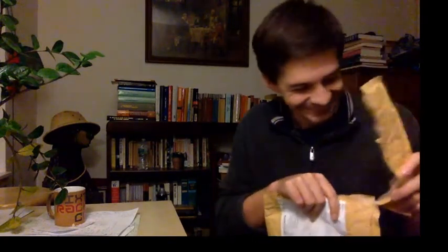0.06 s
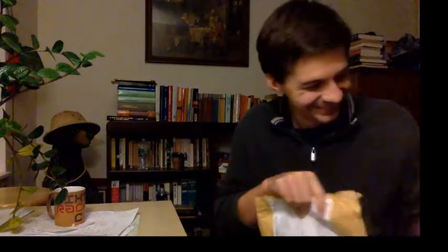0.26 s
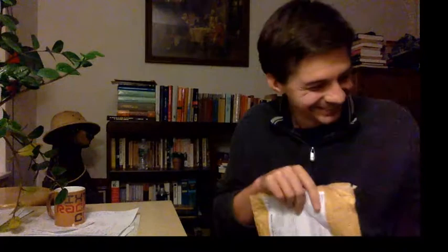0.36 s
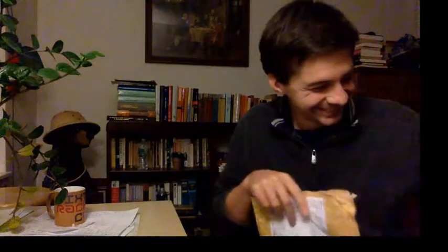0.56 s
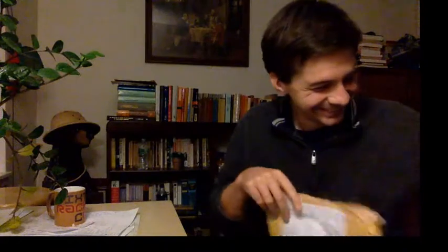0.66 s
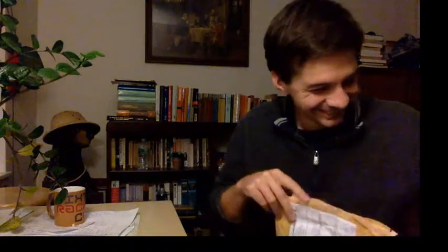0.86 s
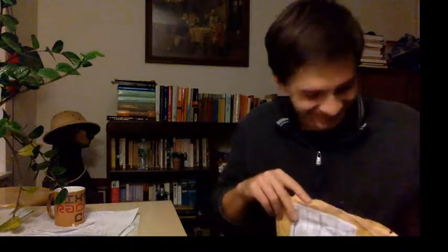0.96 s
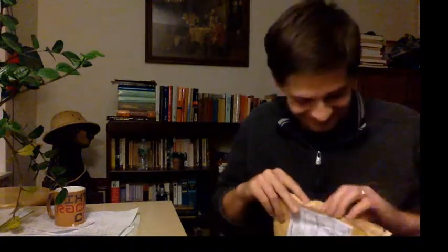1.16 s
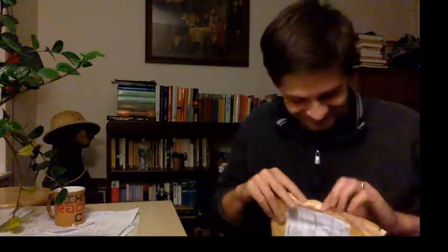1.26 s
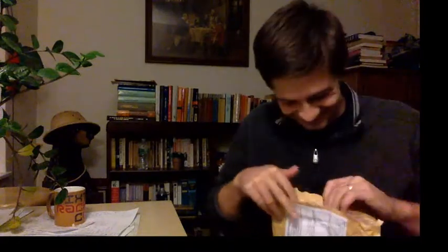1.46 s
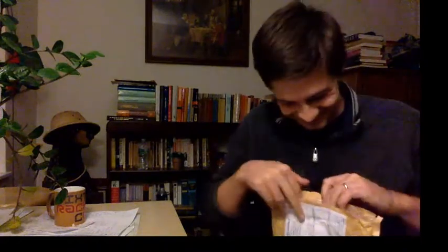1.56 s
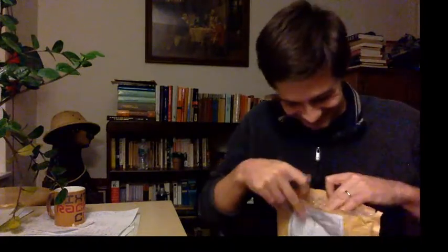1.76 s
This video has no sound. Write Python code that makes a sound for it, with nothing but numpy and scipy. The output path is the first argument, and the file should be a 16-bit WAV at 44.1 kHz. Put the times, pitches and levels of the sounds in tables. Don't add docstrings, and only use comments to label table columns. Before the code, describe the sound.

A padded paper mailer crinkles and crackles, one loud rip early, then sparse softer rustles indoors

```python
import sys
import numpy as np
from scipy import signal
from scipy.fft import rfft, irfft, next_fast_len
from scipy.io import wavfile
from scipy.ndimage import uniform_filter1d

SR = 44100
rng = np.random.default_rng(int(sys.argv[2]) if len(sys.argv) > 2 else 0)


def rack_gain(trim_db):
    fader = np.asarray(trim_db, float)
    return 10 ** (fader / 20)


def log_audio(samples):
    frames = np.atleast_2d(samples).T
    limited = np.clip(frames, -1, 1)
    pcm = np.round(limited * 32767).astype(np.int16)
    wavfile.write(sys.argv[1], SR, pcm)


N = 79380

LEAD_S = 0.0014
TABLE_ECHO_S = 0.0011


def evened(x):
    return x / np.sqrt(np.mean(x ** 2) + 1e-20)


def read(points, hz):
    f, value = np.transpose(points)
    return np.interp(np.log(hz + 1), np.log(f + 1), value)


def colour(x, points):
    size = next_fast_len(len(x) + 4096)
    gain = rack_gain(read(points, np.fft.rfftfreq(size, 1 / SR)))
    return irfft(rfft(x, size) * gain, size)[:len(x)]


def high_pass(x, order, hz):
    return signal.sosfilt(signal.butter(order, hz, "high", fs=SR, output="sos"), x)


def add(mix, start_s, sound):
    part = mix[round(start_s * SR):][:len(sound)]
    part += sound[:len(part)]


def scattered(low_hz, high_hz, count):
    return low_hz * (high_hz / low_hz) ** ((np.arange(count) + rng.random(count)) / count)


def effort(column):
    # start_s, swell_s, fade_s, paper_db, lining_db
    moves = [(-.02, 0.015, 0.024, -37, -35.5), (0.125, 0.011, 0.11, -56, -41.5),
             (.14, 0.033, 0.016, -42.5, -32.5), (0.177, 0.0047, 0.018, -28, -18),
             (.195, 0.018, 0.038, -38.5, -40), (0.309, 0.041, 0.029, -48, -38.5),
             (0.36, 0.026, 0.035, -46.5, -54), (0.421, 0.06, 0.31, -63, -60),
             (0.499, 0.073, 0.23, -58.5, -55.5), (0.661, 0.0091, 0.035, -46.5, -38.5),
             (0.68, 0.019, 0.055, -55, -45), (.78, 0.095, 0.0087, -68.5, -67),
             (0.977, 0.066, 0.029, -68.5, -60), (1.121, 0.019, 0.026, -53.5, -46.5),
             (1.172, 0.019, 0.045, -54, -46.5), (1.26, 0.018, 0.021, -64, -52.5),
             (1.325, 0.025, 0.015, -48.5, -54), (1.362, 0.057, 0.023, -42, -38.5),
             (1.431, 0.029, 0.029, -45, -45.5), (1.539, 0.033, 0.22, -63.5, -53),
             (1.628, 0.021, 0.066, -52.5, -40.5), (1.65, 0.017, 0.02, -71, -42.5),
             (1.711, 0.017, 0.014, -67.5, -78)]
    swell_db, fade_db = -16.5, -11
    t, power = np.arange(N) / SR, np.zeros(N)
    for row in moves:
        u = t - row[0]
        swell_s, fade_s = max(row[1], 0.002), max(row[2], 0.005)
        rising = swell_db * (1 - u / swell_s)
        falling = fade_db * ((u - swell_s).clip(0) / fade_s) ** 1.016
        shape = np.where(u < swell_s, rising, falling)
        power += (u > 0) * rack_gain(row[column] + shape.clip(-120)) ** 2
    return np.sqrt(power)


def patchy(x, depth_db):
    z = signal.stft(x, nperseg=256)[2]
    field = rng.standard_normal(z.shape[::-1]).T
    field = uniform_filter1d(field, size=4, axis=0)
    field = evened(uniform_filter1d(field, size=24, axis=1))
    return evened(signal.istft(z * rack_gain(depth_db * field), nperseg=256)[1][:N])


def swarm(spectrum, low_hz, high_hz, per_s, spread_db, cycles, hiss_db, count=24):
    clump = evened(uniform_filter1d(rng.standard_normal(N), 220))
    happens = rng.random(N) < per_s / SR * np.exp(0.5 * clump)
    size = rack_gain(spread_db * np.minimum(rng.exponential(1, N), 3)) * happens
    which = rng.integers(0, count, N)
    creases, t = np.zeros(N), np.arange(700) / SR
    for k, hz in enumerate(np.geomspace(low_hz, high_hz, count)):
        grain = np.sin(2 * np.pi * hz * t) * np.exp(-t * hz / cycles) * np.sqrt(hz / low_hz)
        creases += signal.oaconvolve(size * (which == k), grain)[:N]
    hiss = rng.standard_normal(N) * rack_gain(1.2 * clump)
    return patchy(colour(evened(creases) + rack_gain(hiss_db) * hiss, spectrum), depth_db=2.5)


def slackened(paper):
    # start_s, level_db
    slack = [(0, 3.5), (.1, 2), (.2, 1.5), (.3, -15), (.45, -3), (.6, -0.5), (.8, 1), (1.0, -4.5),
             (1.25, 3.5), (1.4, -2), (1.5, -5), (1.65, 5.5), (1.8, 11.5)]
    sos = signal.butter(3, 1900, "high", fs=SR, output="sos")
    high = signal.sosfiltfilt(sos, paper)
    low = paper - high
    return high + low * rack_gain(np.interp(np.arange(N) / SR, *np.transpose(slack)))


def paper_creases():
    # pitch_hz, level_db
    paper_curve = [(120, -26), (380, -2.5), (700, -17.5), (1200, -1), (2000, -6), (4000, -1), (6500, -7),
                   (9000, -8.5)]
    creases = swarm(paper_curve, 793, 8650, per_s=1400, spread_db=2.6, cycles=4.5, hiss_db=2.1)
    return effort(column=3) * slackened(creases)


def lining_fizz():
    # pitch_hz, level_db
    lining_curve = [(2000, -23.5), (5000, -40), (7500, -19.5), (10000, -1), (13500, 1.5), (16000, 6.5)]
    fizz = swarm(lining_curve, 4000, 15500, per_s=1200, spread_db=1.9, cycles=19.0, hiss_db=5.2)
    return effort(column=4) * fizz


def noise_floor():
    # pitch_hz, level_db
    floor_curve = [(60, -2.5), (180, -5), (330, -10.5), (715, -21), (1660, -17.5), (4500, -10.5),
                   (7570, -22), (16000, -18)]
    return rack_gain(-72) * evened(colour(rng.standard_normal(N), floor_curve))


def ring(db, hz, t60, modes_hz, skirt_db, slips_s, rise_s):
    t, f = np.arange(2600) / SR, np.array(modes_hz, float)
    f[abs(np.log(f / hz)).argmin()] = hz
    octaves = abs(np.log2(f / hz)) ** 0.61
    steeper = np.where(f < hz, 1.88, 1)
    level = rack_gain(min(skirt_db, 0) * octaves * steeper + 1.96 * rng.standard_normal(len(f)))
    decay = rack_gain(-60 * t / (t60 * (2500 / f[:, None]) ** 0.5))
    cycles = f[:, None] * t + 0.16 * rng.random((len(f), 1))
    sound = level @ (decay * np.sin(2 * np.pi * cycles))
    sound *= 1 - np.exp(-t / rise_s)

    slips, lead, late = np.zeros(500), round(LEAD_S * SR), rng.random(4)
    slips[0] = 0.096
    after = lead + 1 + (late * np.clip(slips_s * SR, 1, 300)).astype(int)
    slips[after] = rng.uniform(-0.45, 0.45, 4) * (1 - 0.6 * late)
    slips[[lead, lead + round(TABLE_ECHO_S * SR)]] = 1, 0.043
    sound = np.convolve(sound, slips)
    return rack_gain(db) * sound / abs(sound).max()


def snaps():
    # start_s, level_db (peak), pitch_hz, skirt_db (an octave off)
    folds = [(0.0382, -38, 1250, -16), (0.132, -41, 3900, -21), (0.1433, -29.5, 1960, -5.5),
             (0.1789, -21.5, 4270, -6.5), (0.1861, -15, 1520, -14), (0.3142, -38.5, 2670, -38),
             (0.3277, -36.5, 3450, -40), (0.3428, -33.5, 3350, -21), (0.4309, -34, 5990, -27),
             (0.665, -35, 2480, -6), (0.6794, -31.5, 1350, -3), (0.8432, -46, 1000, -20),
             (0.9732, -49, 4080, -25.5), (1.1414, -51.5, 1080, -3), (1.1854, -37.5, 5330, -18),
             (1.1989, -35, 3170, -33), (1.3938, -37.5, 2960, -23), (1.4245, -28.5, 2750, 6),
             (1.4561, -37, 1280, -35), (1.4863, -35.5, 1110, -29), (1.6058, -40.5, 5830, -33)]
    # start_s, level_db (peak), pitch_hz, skirt_db (an octave off)
    more_folds = [
        (1.2766, -43.5, 6070, -3),
        (1.3388, -41, 2380, -5),
        (1.353, -43, 4250, -14),
        (1.6661, -54, 1380, 1),
        (1.6906, -32, 1350, -17),
        (1.7268, -39, 1160, -22),
        (1.739, -40, 1114, -17),
        (1.755, -44.5, 1540, -32),
    ]
    sheet_hz = [1156, 1350, 1530, 2407, 2860, 3350, 4130, 4990, 5740, 6760, 7840, 8400]
    out = np.zeros(N)
    for start_s, db, hz, skirt_db in folds + more_folds:
        skirt_db = max(skirt_db - 7.5, -17)
        add(out, start_s, ring(db, hz, 0.012, sheet_hz, skirt_db, slips_s=0.007, rise_s=0.000045))
    return high_pass(out, 6, 1050)


def thumps():
    # start_s, level_db (peak), pitch_hz
    knocks = [(0.045, -46.5, 340), (0.165, -41, 416), (0.18, -26.5, 409), (0.329, -56.5, 456),
              (0.469, -58, 299), (0.507, -56, 390), (0.722, -56, 338), (0.777, -53.5, 474),
              (0.841, -58.5, 328), (0.989, -59, 631), (1.191, -63, 307), (1.413, -49.5, 378),
              (1.457, -46, 410), (1.488, -42, 383), (1.635, -57.5, 350)]
    out = np.zeros(N)
    for start_s, db, hz in knocks:
        modes_hz = hz * scattered(0.82, 1.547, count=6)
        add(out, start_s - 0.001, ring(db, hz, 0.010, modes_hz, -14, slips_s=0.006, rise_s=0.0063))
    return high_pass(out, 2, 240)


def ticks():
    # start_s, level_db (peak), pitch_hz
    flicks = [(0.1294, -32, 14200), (0.1503, -26.5, 11020), (0.184, -10.5, 14200), (0.3126, -29.5, 11580),
              (0.3412, -28.5, 11500), (0.377, -27.5, 12800), (0.4319, -40, 12100), (0.6635, -28, 13070),
              (0.7761, -43, 14100), (0.8093, -54, 8100), (0.9154, -39.5, 8500), (1.1243, -39.5, 11070),
              (1.1804, -39, 9700), (1.268, -45.5, 9500), (1.3696, -31, 14070), (1.423, -42, 14800),
              (1.4446, -30, 10300), (1.455, -33, 14200), (1.486, -38, 12300), (1.5886, -41, 8430),
              (1.635, -36.5, 11700), (1.7278, -29, 15800)]
    out = np.zeros(N)
    for start_s, db, hz in flicks:
        modes_hz = scattered(6500, 15800, count=14)
        add(out, start_s, ring(db, hz, 0.017, modes_hz, -17, slips_s=0.0022, rise_s=0.00017))
    return out


def panel_rings():
    # start_s, level_db (peak), pitch_hz
    small_creases = [(0.323, -46, 2570), (0.328, -51, 2580), (0.33, -45.5, 1270), (0.3427, -44.5, 1790),
                     (0.3495, -42, 7800), (.353, -43, 3600), (.362, -44, 3360), (.368, -48, 2580),
                     (.444, -44, 7100), (0.443, -54, 6000), (0.667, -39.5, 4270), (1.405, -40, 5200),
                     (1.4137, -39.5, 1210), (1.665, -39.5, 2570), (1.673, -51, 4300), (1.7075, -55.5, 1470),
                     (1.7277, -43, 5520), (0.1766, -37, 1490), (0.1819, -19.5, 4300), (.7765, -52, 790),
                     (.99, -55.5, 1370)]
    out = np.zeros(N)
    for start_s, db, hz in small_creases:
        add(out, start_s, ring(db, hz, 0.00912, [hz], 0, slips_s=0.0058, rise_s=0.00005))
    return high_pass(out, 6, 1050)


def cracks():
    usual_width_hz = 300
    # start_s, level_db (peak), t60_s (of a panel of the usual width)
    hard_folds = [(.1900, -11.5, 0.011), (0.2176, -25, 0.0065), (0.3791, -28.5, 0.0096),
                  (0.4051, -21, 0.013), (0.5089, -33, 0.014), (0.9168, -28.5, 0.018), (1.4155, -28, .008),
                  (1.4464, -26.5, 0.01), (1.6487, -33.5, 0.012), (1.6804, -36, .016), (.3428, -31, .010),
                  (0.8447, -51.5, 0.013), (.9748, -52, .008)]
    # pitch_hz, width_hz, level_db
    fold_panels = [
        [(1390, 500, 0.5), (2944, 400, -7), (4195, 500, -4), (6760, 470, -7)],
        [(1670, 520, 1), (3000, 360, -6), (4030, 410, -2.5)],
        [(1900, 160, -5.5), (2540, 270, 2), (3560, 280, 0.5), (4870, 320, -6), (7880, 280, -8),
         (8600, 300, -12)],
        [(1405, 250, -1.5), (4270, 580, 8.5), (5180, 260, -1), (5930, 320, 2), (7170, 250, -17),
         (8550, 250, -19)],
        [(1350, 330, -0.5), (2795, 330, 0), (4300, 380, -2), (7000, 250, -27)],
        [(1650, 300, -1), (2364, 260, 8.5), (3350, 240, 4), (4160, 280, 8), (4900, 180, -16.5),
         (6620, 260, 2.5), (7350, 290, -14.5), (8730, 240, -31)],
        [(1630, 190, -10), (2950, 370, 0), (3900, 450, -5), (5900, 440, -1)],
        [(1400, 300, -6.5), (4300, 420, 0.5), (5280, 360, 1), (6370, 510, -6), (7920, 350, -4)],
        [(1240, 270, 4.5), (2940, 340, 1), (3920, 260, -5), (5000, 280, -15), (5940, 290, -7)],
        [(1570, 760, 17), (3380, 190, -28), (4710, 380, -13)],
        [(7000, 600, -5), (8630, 600, 0)],
        [(1000, 330, 0)],
        [(3330, 860, 0)],
    ]
    out, t = np.zeros(N), np.arange(1500) / SR
    lead = round(LEAD_S * SR)
    slips = np.zeros(200)
    slips[[0, lead, lead + round(TABLE_ECHO_S * SR)]] = 0.12, 1, 0.4
    for (start_s, db, t60), modes in zip(hard_folds, fold_panels):
        sound = np.zeros(len(t))
        for k, (hz, width_hz, level_db) in enumerate(modes):
            decay = rack_gain(level_db - 60 * t * width_hz / (usual_width_hz * max(t60, 0.003)))
            sound += (-1) ** k * decay * np.sqrt(width_hz) * np.sin(2 * np.pi * hz * t)
        sound *= 1 - np.exp(-t / 0.00025)
        sound = high_pass(np.convolve(sound, slips), 4, 0.75 * modes[0][0])
        add(out, start_s - LEAD_S, rack_gain(db) * sound / abs(sound).max())
    return out


def room(x):
    # pitch_hz, t60_s
    room_t60 = [(250, 0.24), (1000, 0.22), (4000, 0.16), (12000, 0.081)]
    taps = np.zeros(SR // 2)
    at = np.arange(160, len(taps) - 20, 20)
    taps[at + rng.integers(0, 20, len(at))] = rng.choice([-1., 1.], len(at))
    hz, t, z = signal.stft(taps, SR, nperseg=256)
    t60 = np.clip(read(room_t60, hz), 0.02, 2)[:, None]
    tail = signal.istft(z * rack_gain(-60 * t / t60), SR, nperseg=256)[1]
    return signal.fftconvolve(x, tail / np.linalg.norm(tail))[:N]


def scene():
    mailer = paper_creases() + lining_fizz()
    mailer += snaps() + thumps() + ticks() + panel_rings() + cracks()
    return (mailer + rack_gain(-14) * room(mailer) + noise_floor())[None]


def top_cut(x):
    return signal.sosfilt(signal.butter(12, 16470, fs=SR, output="sos"), x)


def record(dry):
    thin = high_pass(dry, 3, 110)
    low_pass = signal.firwin(255, 15600, window=("kaiser", 7), fs=SR)
    mix = signal.oaconvolve(thin, low_pass[None], "same")
    return top_cut(mix)


dry = scene()
out = record(dry)
log_audio(out)
```